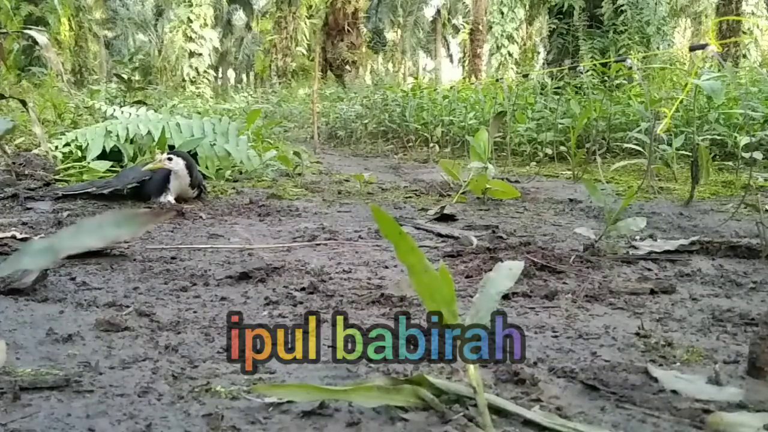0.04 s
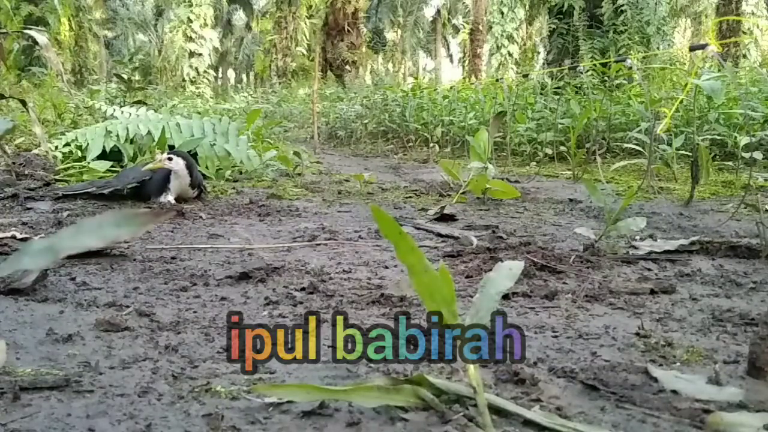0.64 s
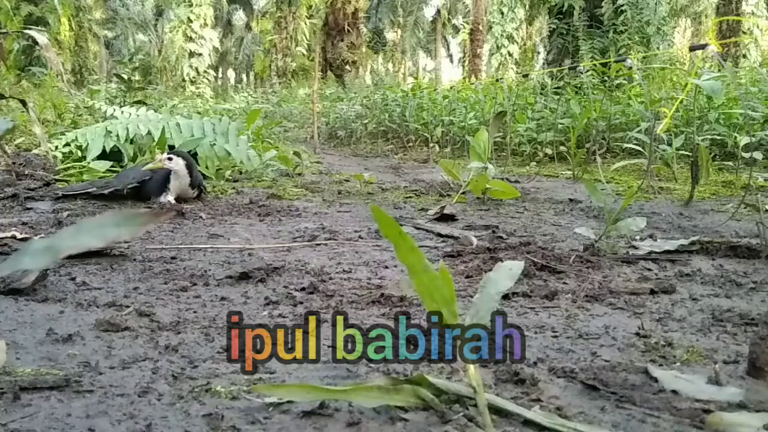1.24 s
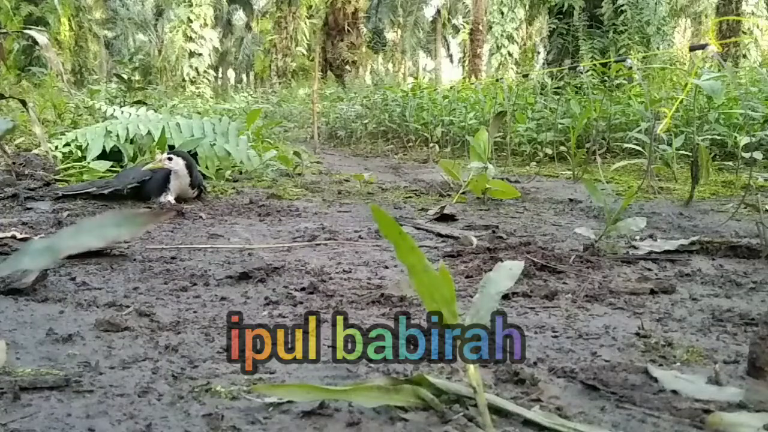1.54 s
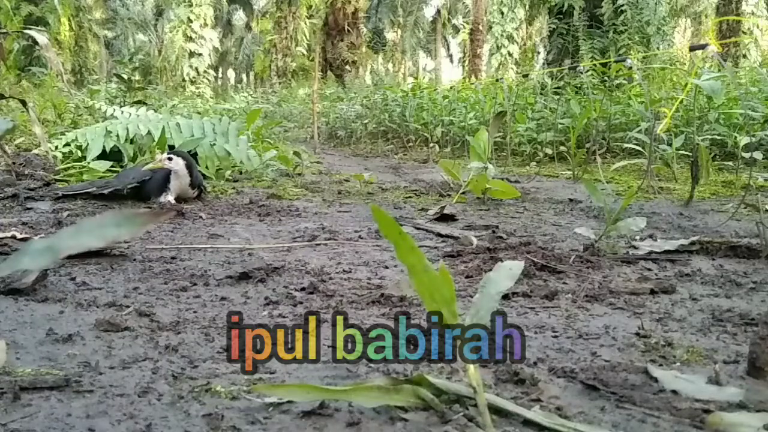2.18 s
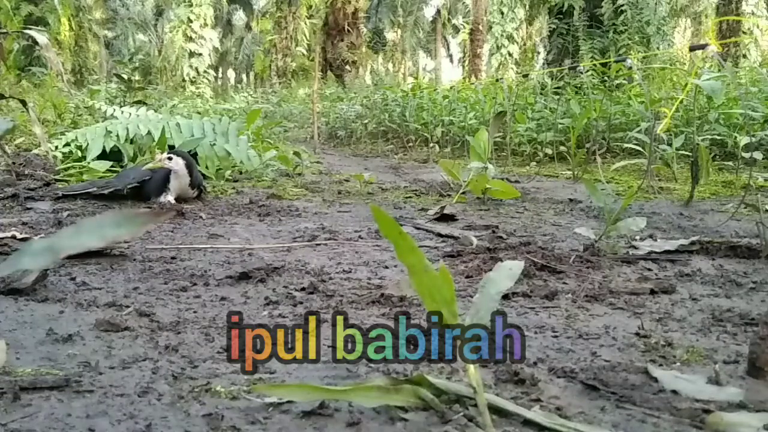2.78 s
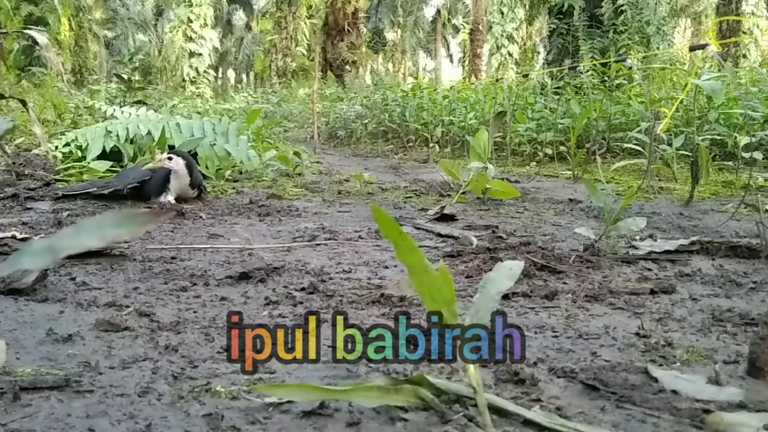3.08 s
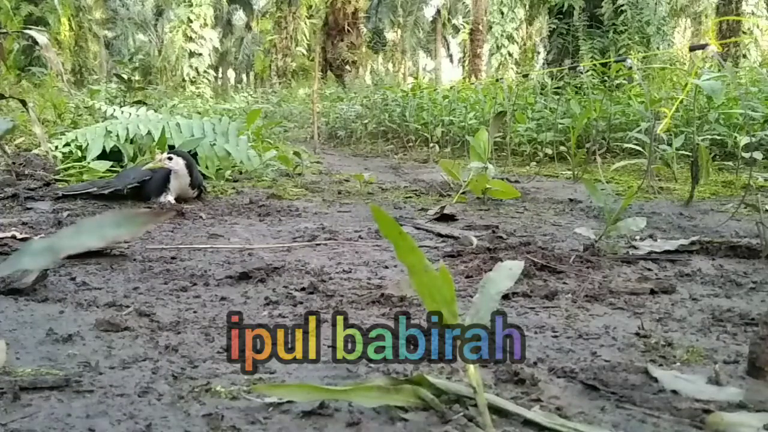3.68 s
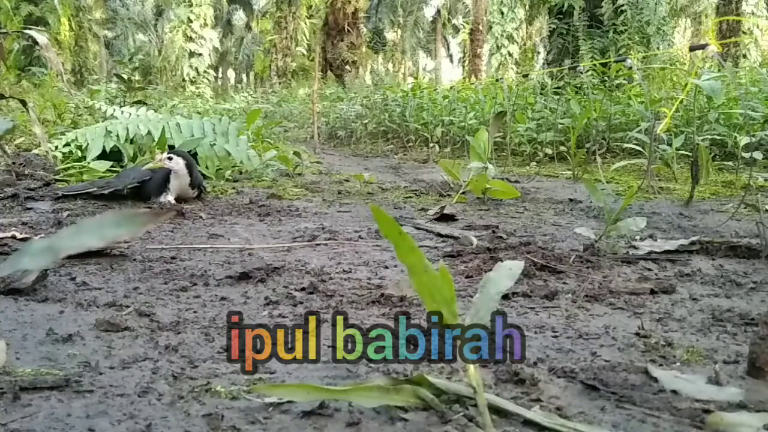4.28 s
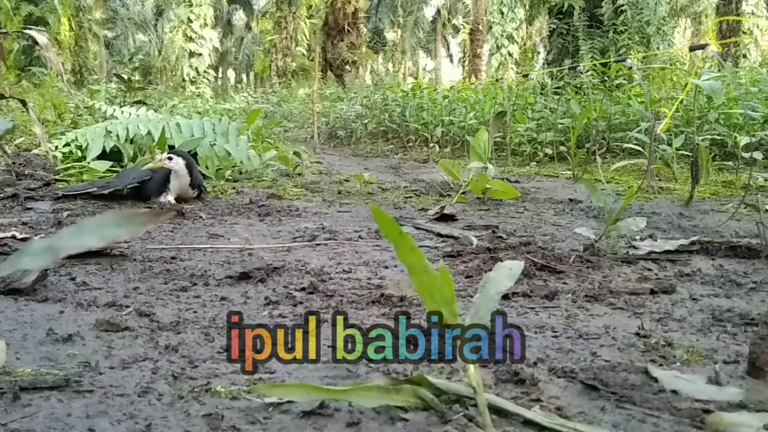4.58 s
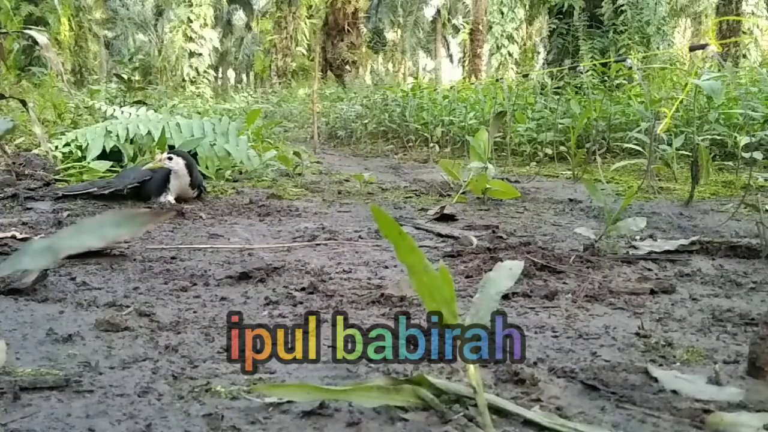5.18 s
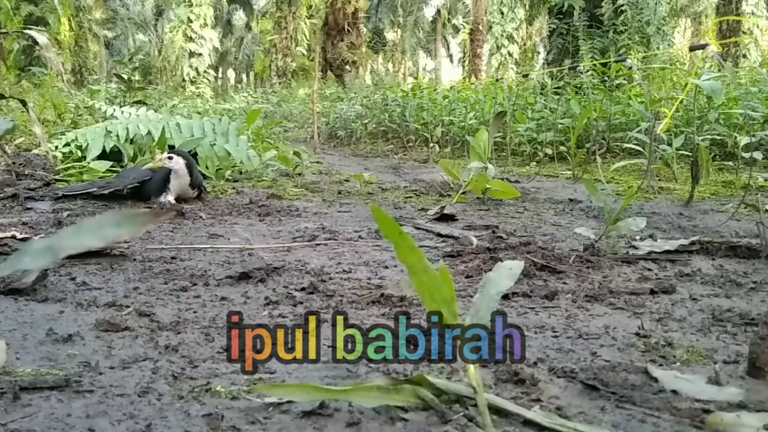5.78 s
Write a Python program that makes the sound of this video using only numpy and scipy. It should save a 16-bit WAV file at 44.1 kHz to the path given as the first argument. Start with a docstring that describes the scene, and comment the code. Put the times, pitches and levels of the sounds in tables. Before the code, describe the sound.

A waterhen calls fairly close in a quiet palm grove, starting at about 0.2 seconds and repeating evenly twice a second until the end, near 6 seconds. Each note lasts about a tenth of a second, breaking from a soft, slightly hoarse lower pitch up into a loud, clear one, followed by a light echo from trunks and leaves. The call at about 4.2 seconds cracks and sounds rougher.

Everything else is much fainter. A thin, high insect hiss runs throughout. A low hum with a little rumble comes and goes, dropping away around 1, 2.7 and 4.9 seconds. A distant bird hoots softly at about 1, 3 and 5 seconds. A very faint cricket chirps from 0.5 to 3.5 seconds, and small birds give barely audible high chirps, mainly around 1.5, 4 and 5.5 seconds.

```python
"""A palm grove. From the start: steady insect hiss, faint high ticks, a low hum that comes and goes.
From 0.2 s a waterhen on the muddy floor calls twice a second; each note breaks from a soft low register
into a loud clear one. Leaves scatter it; trunks and undergrowth echo it. A cricket starts at 0.5 s,
a far bird hoots softly from 0.8 s, small birds chirp from 1 s. Faint chips fall at random throughout."""
import sys
import numpy as np
from scipy import signal
from scipy.fft import rfft, irfft
from scipy.io import wavfile
from scipy.ndimage import uniform_filter1d

SR = 44100
rng = np.random.default_rng(int(sys.argv[2]) if len(sys.argv) > 2 else 0)


def transcribe(u):
    """Save the signal u as a 16-bit wav file named by the first command-line argument.

    u: samples, shape (n,) or (channels, n), limited to [-1, 1]; the rate is SR.
    q: integer samples, one column per channel.
    """
    v = np.clip(np.atleast_2d(u).T, -1, 1)
    q = np.round(v * 32767).astype(np.int16)
    wavfile.write(sys.argv[1], SR, q)


N = 257103

# insect chorus spectrum: f/Hz, relative level/dB
INSECT_SPECTRUM = [(3060, -57), (5200, -31), (5380, -15.5), (6130, -22.5), (6690, -2), (7120, 5), (7610, 3),
                   (8660, -8), (9190, -15.5), (11900, -39.5), (20200, -120)]
# still air spectrum: f/Hz, relative level/dB
AIR_SPECTRUM = [(25, -12.5), (60, -7.5), (150, -10), (400, -18), (1000, -21.5), (2000, -26), (5000, -27),
                (12000, -30), (14300, -21.5), (15500, -28.5)]
# hum envelope: t/s, level/dB
HUM_ENVELOPE = [(0.0, -53.5), (0.01, -57), (0.66, -64), (0.94, -90.5), (1.2, -79), (1.3, -62.5),
                (1.53, -56), (2.16, -56), (2.32, -59.5), (2.58, -84), (2.86, -86.5), (3.09, -62.5),
                (3.72, -56), (3.91, -64.5), (4.2, -55), (4.48, -59.5), (4.9, -86.5), (5.03, -63.5),
                (5.49, -55.5), (5.83, -52.5)]
# hum partials: pitch multiple, relative level/dB
HUM_PARTIALS = [(1, -1.5), (2, -29.5), (3.5, -36)]
# waterhen notes: t/s, level/dB, overtone gain/dB, hoarseness gain/dB, crack/0-1
WATERHEN_NOTES = [(-.28, -26.5, -8.5, -9, 0.5), (.205, -25, -3, 0.5, 0.03), (.709, -24.5, -3, 1.9, 0.05),
                  (1.205, -24, -5, 1.5, 0.1), (1.709, -24, -3, -0.5, 0.1), (2.215, -24, -3.5, 0.3, 0.02),
                  (2.72, -23.5, -0.5, -0.5, 0), (3.2149, -23.5, -6.5, -0.5, 0.04),
                  (3.7205, -24, -0.6, 0.3, 0.03), (4.225, -23.5, 4, 1.6, 0.75),
                  (4.73, -24, -0.5, 0.8, 0.07), (5.226, -23.5, -4.5, -1, 0.08),
                  (5.7305, -23.5, 2.5, 1.6, 0.02)]
# waterhen overtones ahead of the throat: pitch multiple, relative level/dB
VOICE_OVERTONES = [(2, -55), (3, -29), (4, -42.5), (5, -26)]
# throat resonances: f/Hz, width/Hz, gain/dB
THROAT_PEAKS = [(3701, 270, 2.5), (4060, 140, -10), (2440, 200, -17), (4940, 180, -22.5)]
# hoarseness resonances: f/Hz, width/Hz, gain/dB
HOARSE_PEAKS = [(313, 100, -2), (477, 400, -3), (957.5, 360, -1), (1280, 59, -22)]
# leaf scatter relative to the direct sound: f/Hz, gain/dB
LEAF_SPECTRUM = [(150, -28), (330, -5.5), (520, -22.5), (850, -23.5), (1000, -19.5), (1200, -29.5),
                 (1600, -7.5), (2300, -11.5), (3700, -10.5), (4300, -9.5), (8000, -27)]
# echoes off trunks and undergrowth: delay/s, gain/dB
TRUNK_ECHOES = [(.034, -22.5), (.067, -22), (.104, -33), (.122, -34), (.184, -43), (.226, -48), (.35, -56)]
# far hoots: start/s, crest/s, end/s, crest f/Hz, fall/Hz, level the swell heads for/dB, swell/(dB/s)
FAR_HOOTS = [(.76, 0.988, 1.048, 417, 3.6, -59, 40), (.965, 1.085, 1.25, 506, 70, -65, 6),
             (2.661, 3.02, 3.22, 432.4, 48, -56, 18.5), (4.55, 4.958, 5.12, 432.6, 30, -52, 33),
             (5.064, 5.159, 5.22, 424, 10, -72.5, 0)]
# small birds: t/s, half length/s, f/Hz, width/Hz, level/dB
BIRD_CHIRPS = [(1.036, .13, 4160, 150, -86.5), (1.351, 0.18, 4050, 130, -84), (1.509, .17, 4045, 130, -76),
               (2.88, 0.091, 5000, 250, -86), (3.09, 0.095, 4990, 250, -88),
               (3.926, 0.14, 4895, 300, -67.5), (5.431, .15, 3933, 200, -74),
               (5.594, 0.12, 3876, 280, -73.5)]


def undb(db):
    """Decibels to gain."""
    return 10 ** (np.asarray(db) / 20)


def unit_rms(x):
    """Scale to rms 1."""
    return x / np.sqrt(np.mean(x ** 2) + 1e-30)


def add(out, start_s, x):
    """Mix x into out from start_s on."""
    i = max(int(start_s * SR), 0)
    out[i:i + len(x)] += x[:max(len(out) - i, 0)]


def ramp(t, rise_s):
    """Smooth rise from 0 to 1."""
    return np.sin(np.pi / 2 * np.clip(t / rise_s, 0, 1)) ** 2


def bump(t, centre_s, width_s):
    """Smooth flat-topped pulse."""
    return np.exp(-((t - centre_s) / width_s) ** 4)


def phase_of(hz):
    """Running phase/rad of a pitch track."""
    return 2 * np.pi * np.cumsum(hz) / SR


def resonances(peaks, f_hz):
    """Gain at f_hz of steep peaks: f/Hz, width/Hz, gain/dB."""
    return sum(undb(db) / (1 + 2 * ((f_hz - hz) / width_hz) ** 2) ** 2 for hz, width_hz, db in peaks)


def resonant_noise(peaks, size):
    """Noise of rms 1 shaped by resonances."""
    gain = resonances(peaks, np.fft.rfftfreq(size, 1 / SR))
    return unit_rms(irfft(rfft(rng.standard_normal(size)) * gain, size))


def colour(x, spectrum):
    """Filter x by a spectrum: f/Hz, gain/dB."""
    hz, db = np.transpose(spectrum)
    bins_hz = np.fft.rfftfreq(len(x), 1 / SR) + 1
    return irfft(rfft(x) * undb(np.interp(np.log(bins_hz), np.log(hz), db)), len(x))


def hiss(spectrum, rms_db):
    """Steady noise of an insect chorus or still air."""
    return undb(rms_db) * unit_rms(colour(rng.standard_normal(N), spectrum))


def high_ticks(level_db=-85, top_hz=14900, bottom_hz=12800, tick_s=.009, rate_hz=22.05):
    """Falling ticks in threes, unevenly scraped; perhaps a bush cricket."""
    out = np.zeros(N)
    hz = np.linspace(top_hz, bottom_hz, int(tick_s * SR))
    tick = undb(level_db) * np.hanning(len(hz)) * np.sin(phase_of(hz))
    for start_s in np.arange(0, N / SR, 1 / rate_hz):
        for delay_s, gain in ((0, .6), (.0115, 1), (.023, 1)):
            add(out, start_s + delay_s, gain * tick)
    return out * (1 + .5 * resonant_noise([(0, 250, 0)], N))


def hum(pitch_hz=80, rumble_db=-15, waver=.0042):
    """Low hum with a little rumble; wavers, swells, sinks away."""
    level_db = np.interp(np.arange(N) / SR, *np.transpose(HUM_ENVELOPE))
    phase = phase_of(pitch_hz * (1 + waver * resonant_noise([(.0033, 29.66, 0)], N)))
    tone = sum(undb(db) * np.sin(k * phase) for k, db in HUM_PARTIALS)
    rumble = resonant_noise([(57.7, 93, -3), (108, 77, 0), (176, 16, 2.95)], N)
    return undb(level_db) * (np.sqrt(2) * tone + undb(rumble_db) * rumble)


def note_pitch(t, jump_s, low_hz=846, high_hz=1200.2, glide_s=.005, wobble_period_s=.008):
    """The voice wobbles into the low register, glides to the high one, overshoots, settles."""
    wobble_hz = 128 * np.sin(2 * np.pi * t / wobble_period_s) * np.exp(-t / .0056)
    register = 1 / (1 + np.exp((jump_s - t) / glide_s))
    overshoot_hz = 60.28 * np.exp(-((t - .066) / .0075) ** 2)
    return low_hz + wobble_hz + (high_hz - low_hz) * register + overshoot_hz


def note_envelope(t, jump_s, attack_s=.012, hold_s=.017, release_s=.022, sag_db_per_s=-72):
    """A soft push, then a loud sagging one; the voice nearly stops between them."""
    after_s = t - jump_s
    held_s = after_s - attack_s
    soft = .29 * np.tanh(t / .008) * ramp(-after_s, .0075)
    bridge = .13 * bump(after_s, 0, .00375)
    loud = ramp(after_s, attack_s) * ramp(hold_s + release_s - held_s, release_s)
    return soft + bridge + loud * undb(sag_db_per_s * held_s)


def throat_overtones(hz, phase, rasp_db=-42):
    """Overtones shine as they cross throat resonances, over a faint rasp."""
    overtones = sum(undb(db) * resonances(THROAT_PEAKS, k * hz) * np.sin(k * phase)
                    for k, db in VOICE_OVERTONES)
    return overtones + undb(rasp_db) * resonant_noise(THROAT_PEAKS, len(hz))


def register_break(t, phase, jump_s, sub_hz=523, rise_hz_per_s=3000):
    """At the break: brief tones near 1/2 and at 3/2 of the pitch, and a rasp."""
    sub_phase = phase_of(sub_hz + rise_hz_per_s * (t - jump_s))
    sub = undb(-17) * bump(t, .0495, .0075) * np.sin(sub_phase)
    fifth = undb(-32) * bump(t, .042, .007) * np.sin(1.5 * phase)
    rasp = resonant_noise([(1310, 290, 0), (1707, 200, -15), (3620, 87, -9), (4275, 220, -14.5)], len(t))
    return sub + fifth + undb(-39) * bump(t, .052, .013) * rasp


def hoarseness(t, envelope, soft_db=-31, clear_db=-45):
    """Voice noise: the soft half is hoarse, the loud half nearly clear."""
    soft_half = np.minimum(5 * envelope, 1) * bump(t, .02, .04)
    return (undb(soft_db) * soft_half + undb(clear_db) * envelope) * resonant_noise(HOARSE_PEAKS, len(t))


def air_puff(t, gain_db=-30, attack_s=.003, release_s=.009):
    """A small puff of air opens the note."""
    envelope = ramp(t, attack_s) * ramp(attack_s + release_s - t, release_s)
    return undb(gain_db) * envelope * resonant_noise([(920, 410, -1.5), (440, 200, -6.5)], len(t))


def voice_crack(t, phase, tone_db=-18, spit_db=-31):
    """A crack throws off a tone a third higher and a spit of noise."""
    tone = bump(t, .069, .009) * np.sin(1.22 * phase)
    spit = resonant_noise([(3650, 300, 0), (4100, 400, -4), (2600, 900, -22)], len(t))
    return undb(tone_db) * tone + undb(spit_db) * bump(t, .061, .009) * spit


def waterhen_note(overtone_db, hoarse_db, crack, length_s=.11, jump_s=.0485):
    """A near sine that jumps register; if cracked, it bursts upward early and catches twice."""
    t = np.arange(int(length_s * SR)) / SR
    burst = crack * bump(t, .0555, .003)
    catches = crack * (bump(t, .0605, .0016) + bump(t, .073, .002))
    jitter = .004 * resonant_noise([(0, 200, 0)], len(t))
    hz = note_pitch(t, jump_s) * (1 + .09 * burst + jitter)
    phase = phase_of(hz)
    envelope = note_envelope(t, jump_s) * (1 - .7 * catches) * (1 - .15 * crack) + .6 * burst
    envelope = uniform_filter1d(envelope, size=60) * np.tanh(t / .0024) ** 2
    brightness = undb(overtone_db) * np.abs(envelope) ** 1.7  # grows faster than the fundamental
    voice = envelope * np.sin(phase) + brightness * throat_overtones(hz, phase)
    voice += register_break(t, phase, jump_s)
    voice += undb(hoarse_db) * hoarseness(t, envelope)
    return voice + air_puff(t) + crack * voice_crack(t, phase)


def waterhen():
    """One note repeated with varying strength and edge, plus its echoes."""
    calls = np.zeros(N + SR)  # 1 s lead-in: the bird is already calling
    for start_s, level_db, overtone_db, hoarse_db, crack in WATERHEN_NOTES:
        note = waterhen_note(overtone_db, hoarse_db, crack)
        add(calls, start_s + 1, np.sqrt(2) * undb(level_db) * note)
    return (calls + grove_echoes(calls))[SR:]


def scatter(t60_s, build_s):
    """Diffuse unit-energy tail from many leaves."""
    t = np.arange(SR // 2) / SR
    tail = rng.standard_normal(len(t)) * undb(-60 * t / t60_s) * np.clip(t / build_s, 0, 1) ** 2
    return tail / np.sqrt(np.sum(tail ** 2))


def grove_echoes(x, tail_db=-36, ground_hz=1100):
    """Near leaves scatter; far trunks return echoes and a tail, whose lows the soft ground cancels."""
    near = colour(scatter(t60_s=.3, build_s=.05), LEAF_SPECTRUM)
    far = undb(tail_db) * scatter(t60_s=.8, build_s=.05)
    for delay_s, db in TRUNK_ECHOES:
        add(far, delay_s, undb([db]))
    ground = signal.butter(10, ground_hz, "high", fs=SR, output="sos")
    return signal.fftconvolve(x, near + signal.sosfilt(ground, far))[:len(x)]


def chirp(half_s, hz, width_hz):
    """A far chirp, smeared by foliage into a narrow band that swells and dies."""
    progress = np.linspace(0, 1, int(2 * half_s * SR))
    envelope = np.sin(np.pi * np.sqrt(progress)) ** 4
    return envelope * resonant_noise([(hz, width_hz, 0)], len(progress))


def cricket(start_s=.525, end_s=3.45, period_s=.1373, jitter_s=.013, pitch_hz=9120, half_s=.067):
    """One bout of near-regular chirps, tending louder mid-bout."""
    out = np.zeros(N)
    times_s = np.arange(start_s, end_s, period_s)
    arch_db = -74 - 4 * np.linspace(-1, 1, len(times_s)) ** 2
    deviations = rng.standard_normal((len(times_s), 3))
    for time_s, db, (later, louder, higher) in zip(times_s, arch_db, deviations):
        stroke = chirp(half_s, pitch_hz + 70 * higher, width_hz=300)
        add(out, time_s + jitter_s * later - half_s / 2, undb(db + 4 * louder) * stroke)
    return out


def hoots(scoop_hz=39.1, waver=.0048, attack_s=.055, release_s=.04, hoarse_db=-31, wet_db=-13):
    """A far bird's nearly pure notes scoop up to a crest and fall; the trees blur them."""
    out = np.zeros(N)
    for start_s, crest_s, end_s, crest_hz, fall_hz, level_db, swell_db_per_s in FAR_HOOTS:
        t = np.arange(start_s, end_s, 1 / SR)
        before = np.maximum(crest_s - t, 0) / (crest_s - start_s)
        after = np.maximum(t - crest_s, 0) / (end_s - crest_s)
        hz = crest_hz - scoop_hz * before ** 1.1 - fall_hz * after ** 2
        flutter_db = resonant_noise([(.00075, 75, 0)], len(t))
        envelope = undb(level_db + flutter_db - swell_db_per_s * (end_s - t))
        envelope *= ramp(t - start_s, attack_s) * ramp(end_s - t, release_s)
        phase = phase_of(hz * (1 + waver * resonant_noise([(.013, 46, 0)], len(t))))
        rasp = undb(hoarse_db) * resonant_noise([(413, 660, 0)], len(t))
        add(out, start_s, envelope * (np.sqrt(2) * np.sin(phase) + rasp))
    return out + undb(wet_db) * signal.fftconvolve(out, scatter(t60_s=.97, build_s=.0036))[:N]


def small_birds(chip_count=24, chip_low_hz=3966, chip_high_hz=10900, chip_db=-89):
    """Chirps in the canopy; fainter chips at random times and pitches."""
    out = np.zeros(N)
    for start_s, half_s, hz, width_hz, level_db in BIRD_CHIRPS:
        add(out, start_s, undb(level_db) * chirp(half_s, hz, width_hz))
    for when, height in rng.random((chip_count, 2)):
        hz = chip_low_hz * (chip_high_hz / chip_low_hz) ** height
        add(out, when * N / SR, undb(chip_db) * chirp(half_s=.046, hz=hz, width_hz=190))
    return out


def scene():
    """Mono mix: background, near bird, far voices."""
    background = hiss(INSECT_SPECTRUM, rms_db=-68) + hiss(AIR_SPECTRUM, rms_db=-84.5)
    voices = waterhen() + hoots() + small_birds() + cricket()
    return (background + voices + high_ticks() + hum())[None]


def record(dry):
    """Steep low-pass at 15.5 kHz."""
    return signal.sosfilt(signal.ellip(8, .2, 70, 15500, fs=SR, output="sos"), dry)


dry = scene()
out = record(dry)
transcribe(out)
```